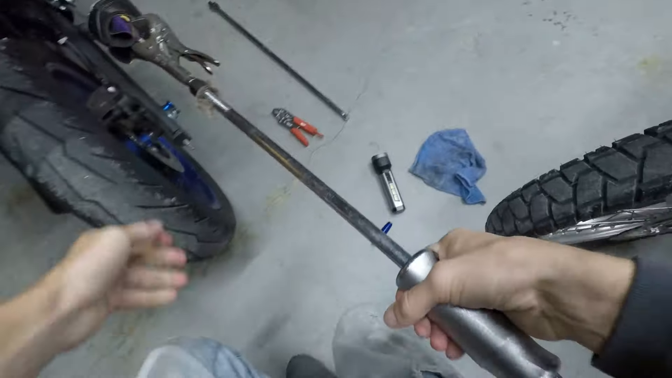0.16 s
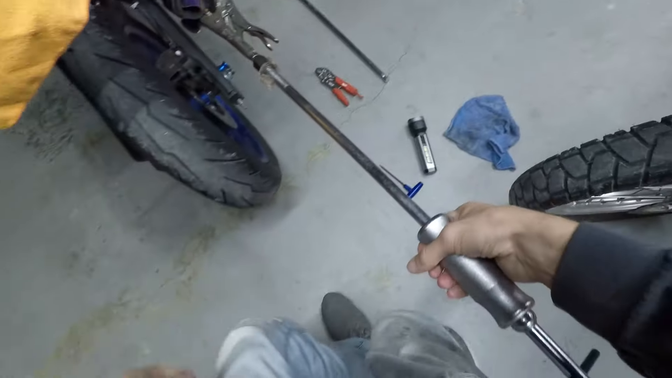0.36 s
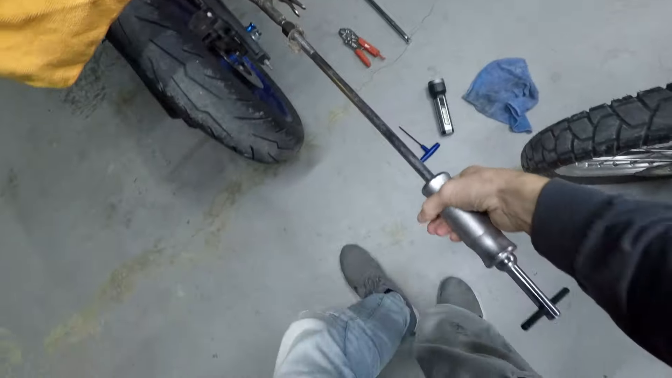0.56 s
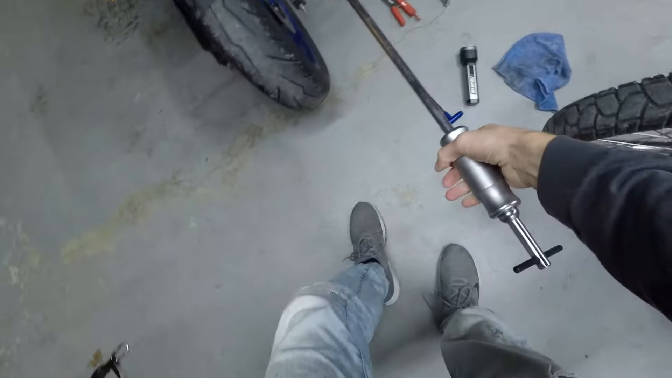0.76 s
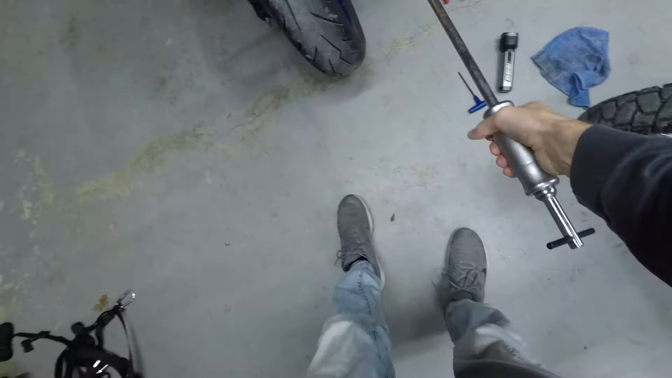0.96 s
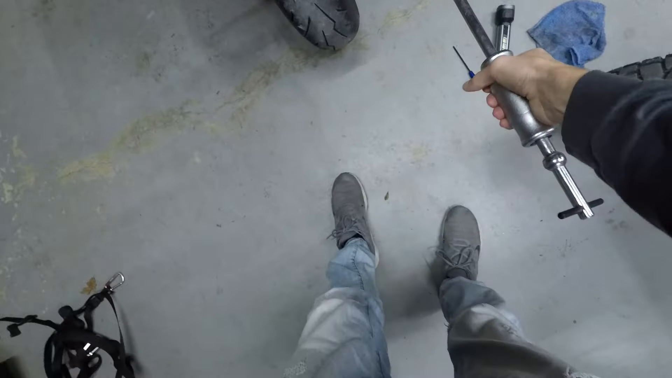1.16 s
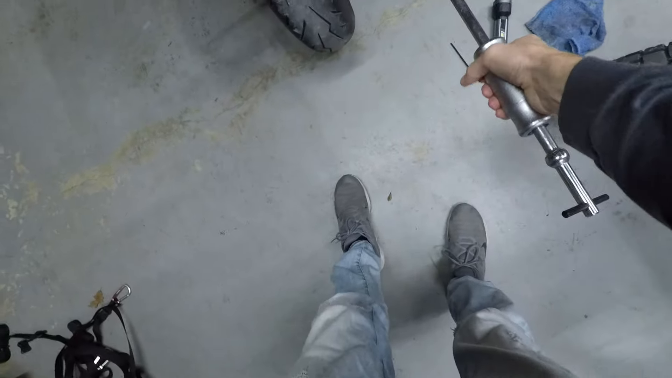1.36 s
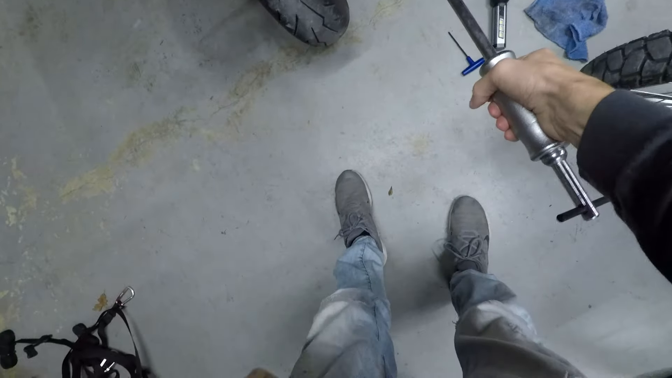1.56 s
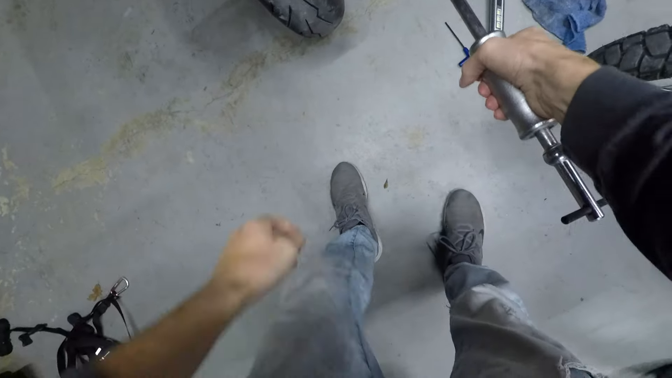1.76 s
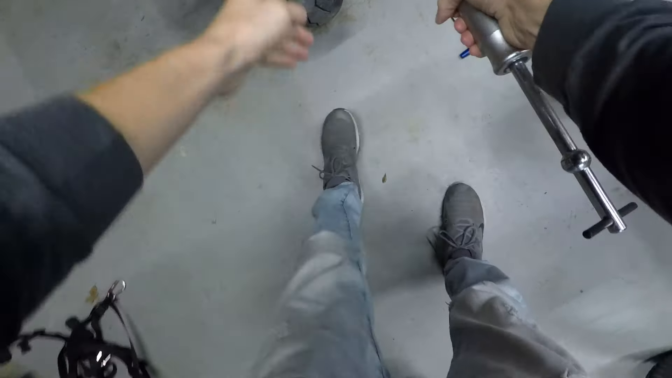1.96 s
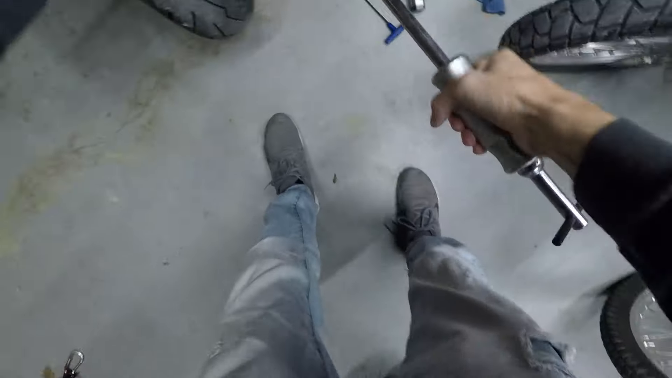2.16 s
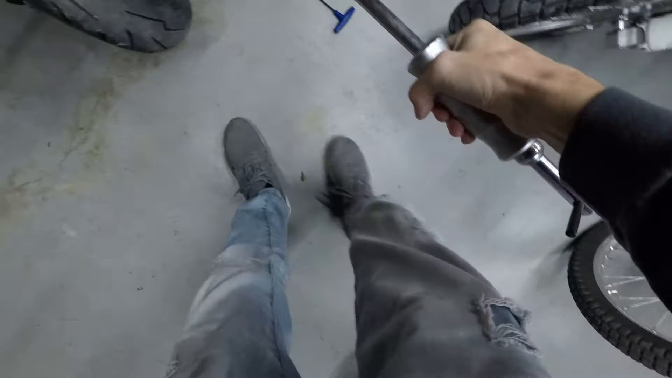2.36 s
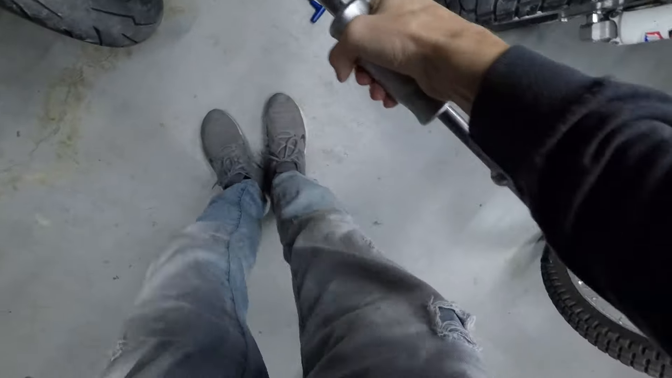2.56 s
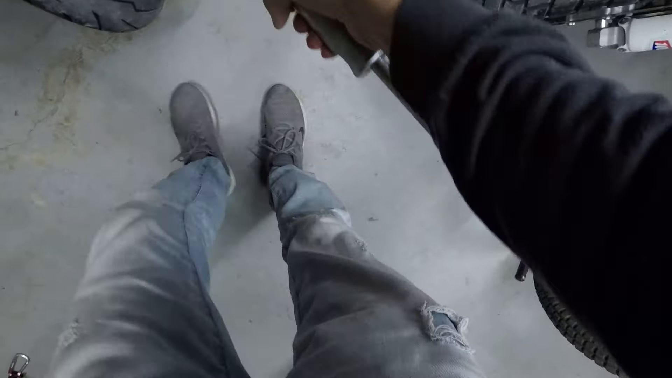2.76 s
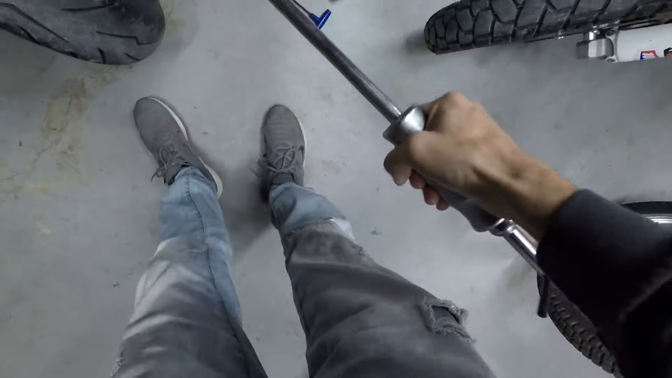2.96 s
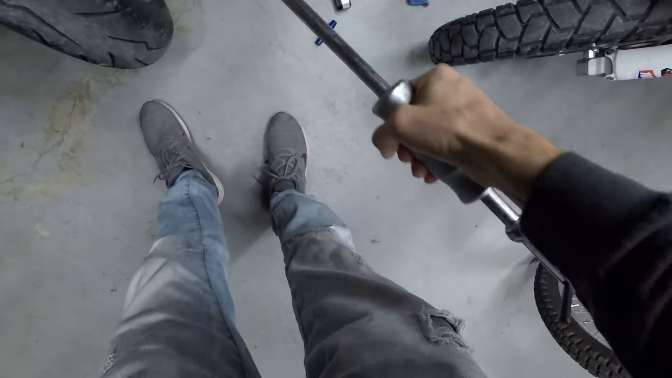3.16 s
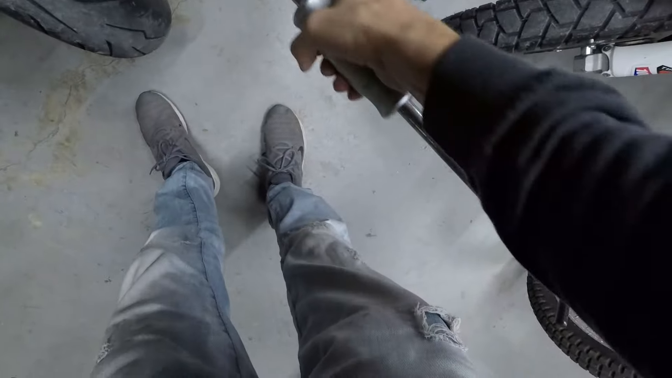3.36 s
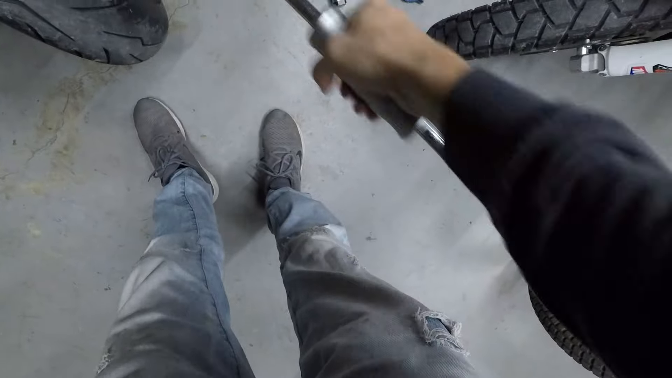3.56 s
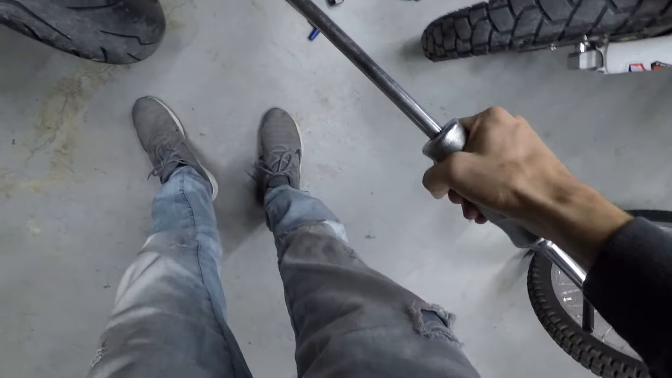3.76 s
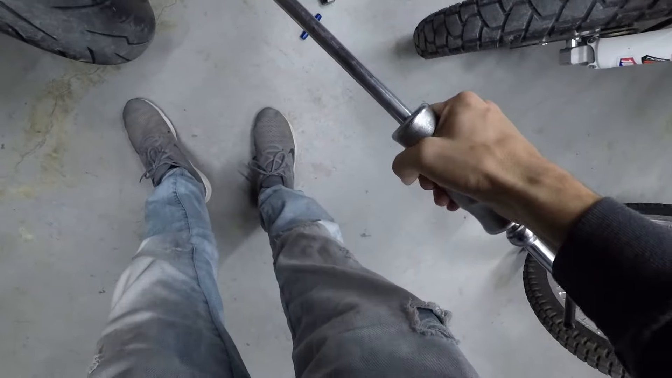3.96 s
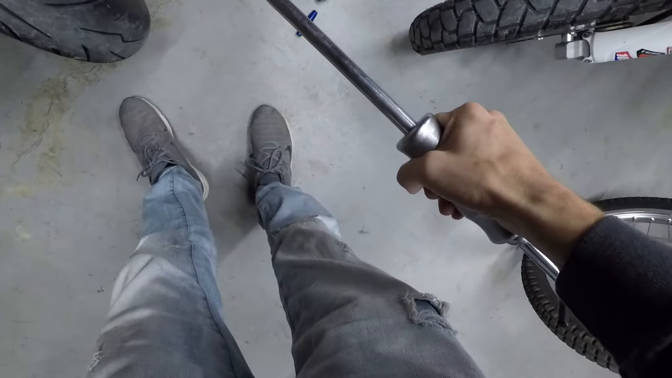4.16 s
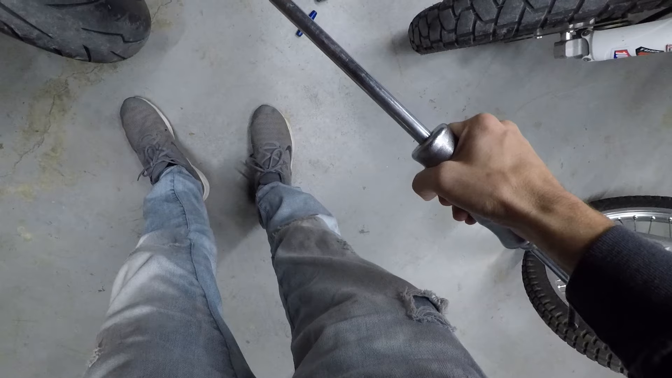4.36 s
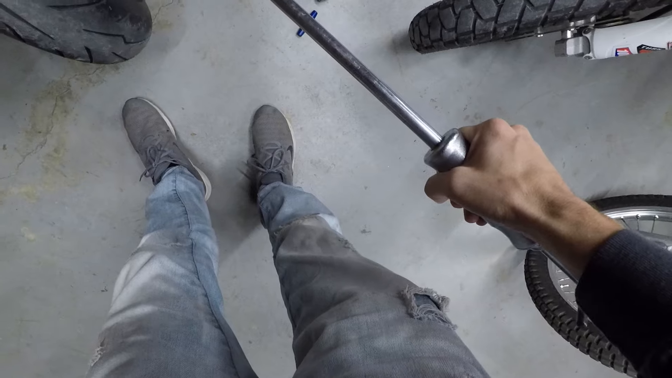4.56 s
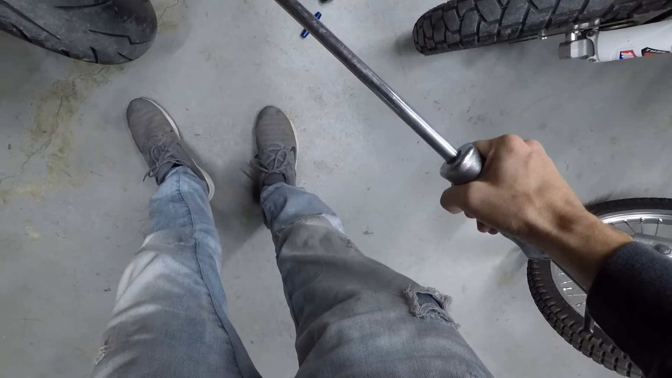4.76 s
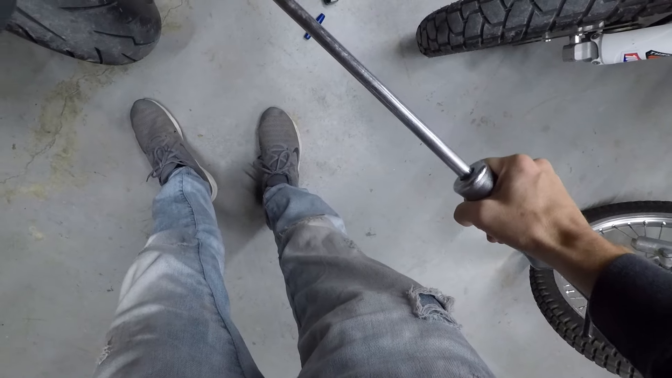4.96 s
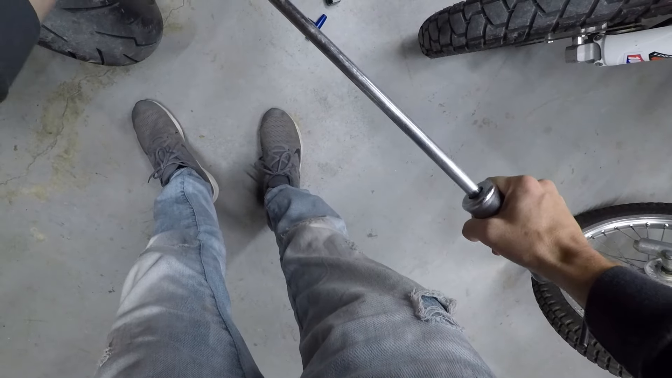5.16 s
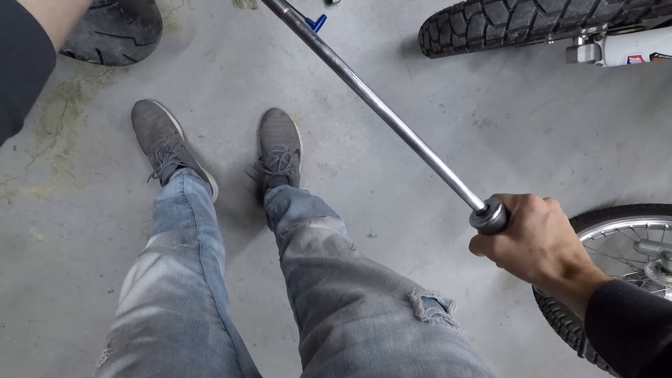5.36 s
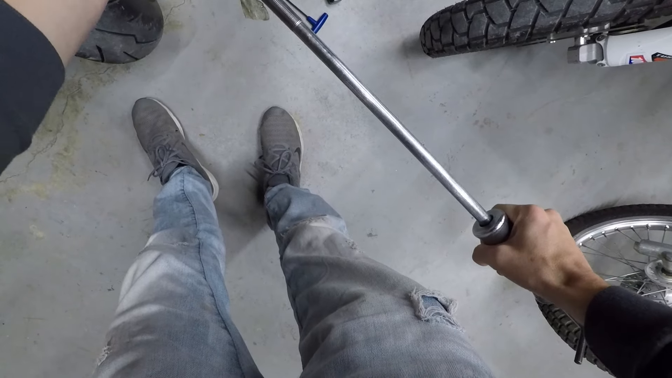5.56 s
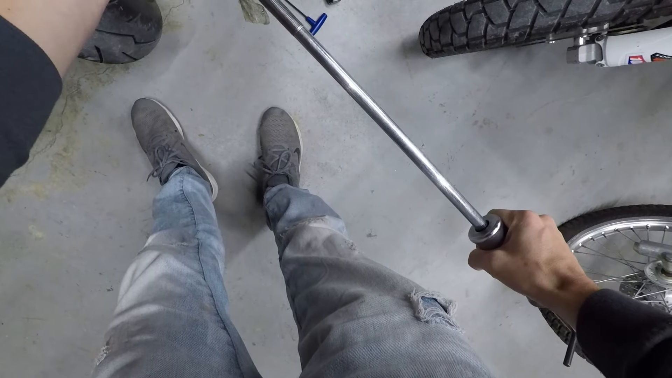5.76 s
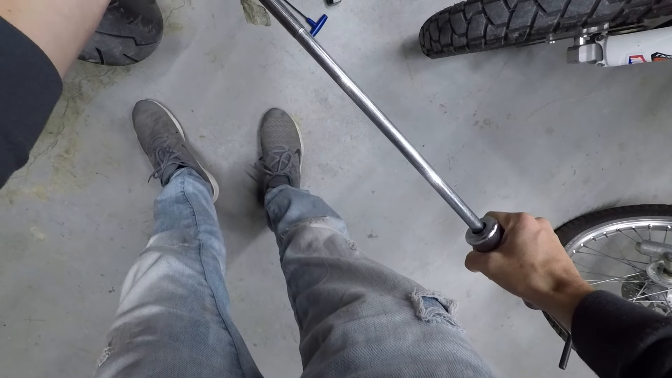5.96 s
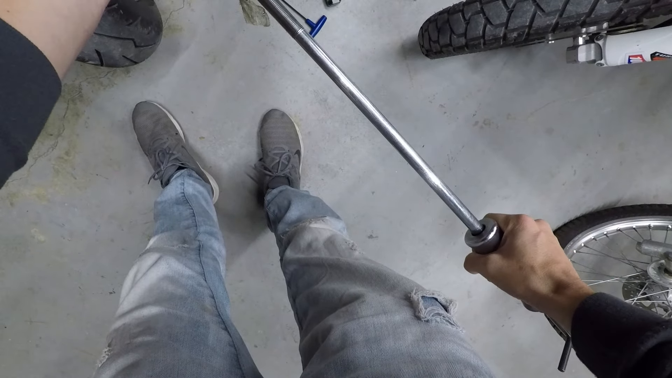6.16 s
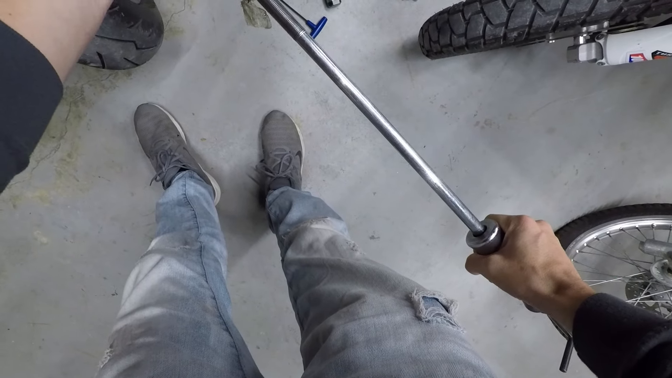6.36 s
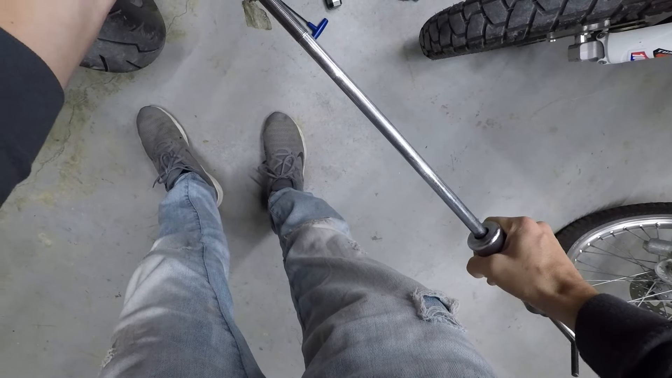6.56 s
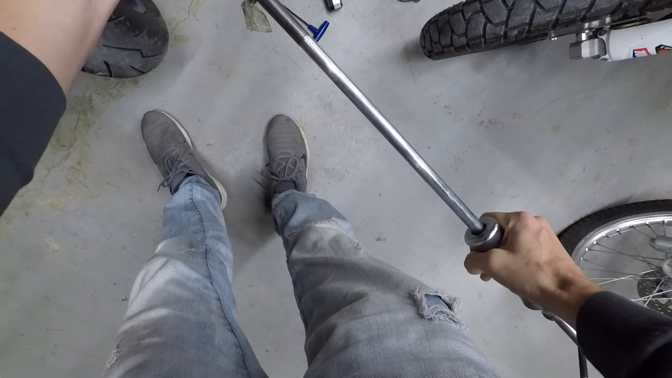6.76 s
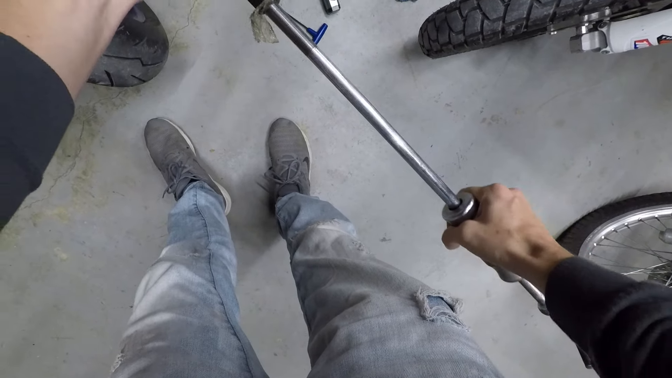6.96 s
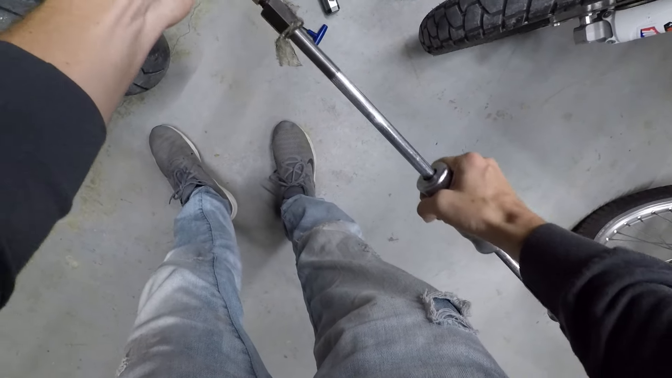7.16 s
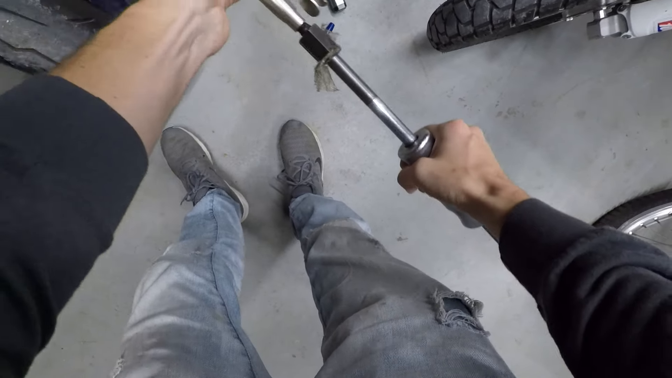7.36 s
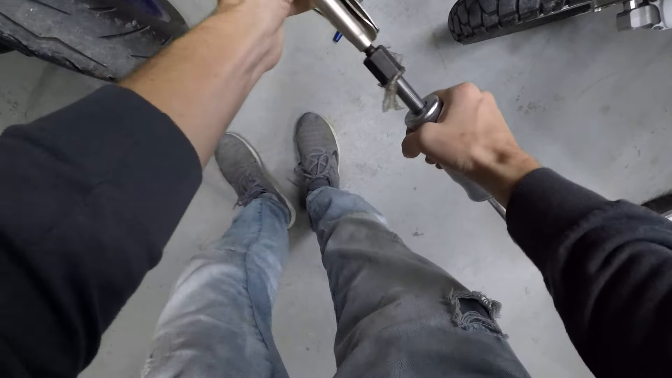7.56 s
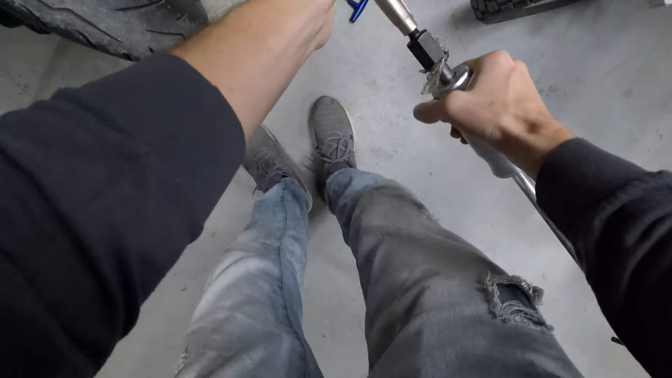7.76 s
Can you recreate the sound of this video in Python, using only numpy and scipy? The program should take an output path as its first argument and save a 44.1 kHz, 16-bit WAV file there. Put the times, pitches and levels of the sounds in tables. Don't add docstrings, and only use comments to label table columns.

```python
import sys
import numpy as np
from scipy import signal
from scipy.fft import rfft, irfft
from scipy.io import wavfile
from scipy.ndimage import uniform_filter1d

SR = 44100
rng = np.random.default_rng(int(sys.argv[2]) if len(sys.argv) > 2 else 0)


def elevation(decibels):
    levels = np.asarray(decibels, float)
    return 10 ** (levels / 20)


def unload_wav(signal):
    wavfile.write(
        sys.argv[1],
        SR,
        np.round(np.clip(np.atleast_2d(signal).T, -1, 1) * 32767).astype(np.int16),
    )


N = 344762
LEAD = SR // 4

# first touch t/s, peak level/dB, case jolt level/dB, clatter length t/s, wait for the full blow t/s,
# treble tilt/dB, free ring level/dB
BLOWS = [
    (1.4288, -4, -51.5, 0.0068, .0036, 0, -24),
    (2.1303, 2, -34, .005, 0.0018, 1, -23),
    (2.888, 2, -25.5, .0065, 0.0013, 1, -27),
    (3.6423, 1, -31, .007, .0015, 2.5, -26),
    (4.1203, -22.5, -63, 0.0073, 0.0011, -1, -26),
]
# start t/s, length t/s, first level/dB, last level/dB,
# treble tilt/dB
STROKES = [
    [(1.016, 0.086, -48.5, -62, -21), (1.11, 0.14, -62, -57, -18)],
    [(1.33, 0.06, -74, -48, -16.5), (1.39, 0.046, -45, -43, -12)],
    [(1.665, .08, -47.5, -55, -14.5)],
    [(1.754, 0.08, -45, -47, -13)],
    [(1.835, 0.14, -45, -59, -14)],
    [(1.99, .13, -63, -39, -11.5)],
    [(2.45, .025, -58, -50, -15), (2.47, 0.07, -46, -46, -14.5)],
    [(2.535, 0.09, -43, -47, -14.5)],
    [(2.62, 0.11, -44, -60, -14.5)],
    [(2.78, .025, -32, -49.5, -2.5), (2.81, .075, -49.5, -44.5, 5.5)],
    [(3.15, .2, -56, -46.5, -18), (3.355, 0.11, -44.5, -61, -20)],
    [(3.5, .075, -64, -44, -10), (3.585, .055, -39, -42.5, -7)],
    [(4.15, .11, -63, -68, -3), (4.29, .11, -58, -76.5, -4)],
    [(4.615, .07, -78, -78, 10), (4.695, 0.13, -69, -79, 8)],
    [(4.85, 0.13, -73, -72, 6)],
    [(5.03, .08, -72, -65, 3), (5.14, 0.048, -69, -65, -5)],
]
# f/Hz, width/Hz, level among the modes/dB
ROD_EARLY = [
    [(910, 61, 0), (1430, 27, 0), (1640, 70, -6), (2470, 46, -6), (3620, 64, -9), (4790, 52, -13),
     (7520, 140, -21)],
    [(910, 71, -9), (1502, 40, -4), (2472, 55, -4), (3000, 81, -5), (4150, 50, 1), (7550, 70, -9)],
    [(480, 50, -8), (904, 60, -8), (1760, 93, -4), (2130, 40, -5), (3290, 80, -5), (4120, 42, -5),
     (4810, 31, -1)],
    [(754, 66, -7), (1780, 35, -3), (2110, 53, 0), (2510, 190, -6), (4150, 41, -9), (5330, 38, -11)],
    [(764, 25, -1), (1380, 51, 0), (2090, 36, -3), (2950, 30, -3), (3290, 30, -7), (3690, 34, -6)],
    [(1380, 110, -3), (1870, 53, -1), (2920, 36, -2), (3860, 140, 0), (4740, 76, -5), (5740, 160, -9),
     (6290, 160, -7)],
    [(1460, 60, 0), (2980, 34, -3), (4190, 240, -2), (4790, 25, -3), (5470, 150, -7), (7850, 38, -9)],
    [(775, 32, -6), (1410, 41, -5), (4220, 190, 0), (4760, 34, -6), (5640, 46, -8), (7850, 31, -17)],
    [(1640, 54, -1), (2070, 170, -8), (3200, 49, -2), (4260, 80, -4), (4830, 47, 0), (7630, 61, -13)],
]
# f/Hz, width/Hz, level among the modes/dB
ROD_LATER = [
    [(1450, 61, -2.5), (3800, 90, -6), (4950, 120, -4), (7580, 90, -1), (9100, 100, -3), (10800, 70, -6),
     (12400, 90, -9)],
    [(1400, 60, 5), (2457, 48, -3), (2700, 60, -5), (3530, 80, -7), (4700, 68, -16)],
    [(1400, 92, -2.5), (2610, 51, 0.5), (3500, 34, -4), (6170, 110, -5), (7310, 81, -14), (9130, 83, -8)],
    [(797, 77, 11), (2430, 50, 2), (5630, 54, -10), (7580, 56, -13)],
    [(2310, 66, -2), (4300, 40, 0), (5400, 50, -1), (7250, 70, 0), (8000, 90, -2), (8450, 50, -3),
     (14300, 180, -10)],
    [(2200, 66, -3), (4200, 25, 5), (7050, 50, 1), (8000, 90, -6), (8900, 60, -2), (10500, 90, -7),
     (14200, 180, -10)],
    [(2280, 40, 4), (4300, 80, -4), (6100, 90, -5), (7300, 70, -3), (8900, 70, -2)],
]
# f/Hz, width/Hz, level above the scrape/dB
BAR = [(560, 53, -10.5), (1160, 50, -14), (1655, 60, -6), (2140, 50, -9), (2900, 50, -6), (3370, 50, -9),
       (4680, 70, -8), (5520, 70, -11), (5930, 88, -13), (6300, 80, -18.5), (7440, 70, -13)]
# f/Hz, level per Hz/dB
SCRAPE = [(180, -51), (300, -19), (444, -5), (597, -14.5), (763, 0), (1010, -9.5), (1420, -2), (3440, -7.5),
          (4180, -9), (15000, -37)]
# start t/s, length t/s, first level/dB, last level/dB,
# tube ring above the scrape level/dB
DRAG = [
    [(6.72, .055, -80, -70, -20), (6.775, .2, -66, -63, -14), (6.97, 0.04, -60.5, -59, -16),
     (7.01, .07, -60, -59, -1)],
    [(7.08, 0.1, -47.5, -56, 1.5), (7.18, 0.09, -54, -52, -8), (7.265, 0.12, -48, -56, -6),
     (7.38, 0.036, -47.5, -48, -6), (7.43, 0.075, -48, -47, -3)],
    [(7.505, 0.07, -29, -37, 5), (7.575, .09, -37, -54, 1), (7.665, .05, -58, -64, 9),
     (7.71, 0.045, -66, -54, 15), (7.75, 0.073, -44, -39, 1)],
]
# f/Hz, width/Hz, level/dB
TUBE = [
    [(1250, 120, -14), (1720, 42, -12.5), (2040, 67, -7), (2280, 31, -21), (2516, 27, 1), (4200, 46, -4),
     (5600, 60, -8), (4850, 120, -9.5), (6250, 68, -11), (7550, 210, -22)],
    [(1155, 34, -13), (1563, 30, 0), (1895, 44, -6), (2477, 78, 0.5), (2900, 73, -4), (3370, 37, -10.5),
     (3534, 27, -2.5), (4300, 51, -1.5), (4930, 82, -2), (5650, 76, -11.5), (6330, 63, -11)],
    [(1867, 156, 2), (2570, 30, -3), (2850, 60, -2), (3400, 60, -5), (3925, 39, -4), (4220, 50, -3),
     (5320, 50, -4), (5700, 110, -7), (6540, 62, -19), (7280, 23, -27), (7720, 45, -22)],
]
# f/Hz, width/Hz, level/dB
TUBE_RING = [(916, 17, 0), (968, 30, -8), (840, 50, -10)]


def evened(x):
    return x / np.sqrt(np.mean(x ** 2) + 1e-20)


def peaked(x):
    return x / abs(x).max()


def read(points, hz):
    f, value = np.transpose(points)
    return np.interp(np.log(hz + 1), np.log(f + 1), value)


def add(mix, s, sound):
    part = mix[round(s * SR) + LEAD:][:len(sound)]
    part += sound[:len(part)]


def colour(x, points, tilt_db=0):
    hz = np.fft.rfftfreq(2 * len(x), 1 / SR)
    lift_db = tilt_db * np.clip(np.log2(hz / 3500 + 1e-9), -1, 1.6)
    return irfft(rfft(x, 2 * len(x)) * elevation(read(points, hz) + lift_db))[:len(x)]


def ring(x, modes, spread_db=0, wander_db=0):
    out = np.zeros(len(x))
    steps = np.arange(0, len(x) + 1300, 1300)
    chances = rng.standard_normal((len(modes), len(steps) + 2))
    for (hz, width, db), luck in zip(modes, chances):
        r = np.exp(-np.pi * width / SR)
        wander = wander_db * np.interp(np.arange(len(x)), steps, luck[2:])
        mix_db = db + spread_db * luck[0] + wander
        hz = hz * (1 + .005 * spread_db * luck[1])
        poles = [1, -2 * r * np.cos(2 * np.pi * hz / SR), r * r]
        out += signal.lfilter([1 - r, 0, r - 1], poles, x * elevation(mix_db))
    return out


def clatter(length, rise=0.0008, shape=0.7):
    t = np.arange(SR // 5) / SR
    decay = np.exp(-(t / max(length, .001)) ** shape)
    return rng.standard_normal(len(t)) * (1 - np.exp(-t / rise)) * decay


def grit(count, rough=.6, grain=60):
    slips = evened(uniform_filter1d(rng.standard_normal(count), max(int(grain), 1)))
    return evened(rng.standard_normal(count) * np.exp(rough * slips))


def push(t, start, length, first_db, last_db):
    grip_s, slip_s = .008, 0.011
    hold = np.clip((t - start) / grip_s, 0, 1) * np.exp(-np.maximum(t - start - length, 0) / slip_s)
    return hold * elevation(np.interp(t, [start, start + length], [first_db, last_db]))


def during(rows):
    return np.arange(rows[0][0], rows[-1][0] + rows[-1][1] + .1, 1 / SR)


def glide(x, drive, depth):
    creep = evened(uniform_filter1d(uniform_filter1d(drive, size=2500), size=2500))
    at = np.cumsum(1 + depth * creep)
    return np.interp(at - at[0], np.arange(len(x)), x)


def knocks(rows, length, modes_at, ring_db, spread_db):
    out = np.zeros(N + LEAD)
    for s, db, tilt_db, hz in rows:
        drive = clatter(length, rise=.002)
        burst = peaked(colour(drive, SCRAPE, 0.5 * tilt_db + 7.5))
        flat_drive = colour(drive, [(100, 0), (16000, 0)], .5 * tilt_db + 7.0)
        body = burst + elevation(ring_db) * peaked(ring(flat_drive, modes_at(s), spread_db))
        hardest = peaked(ring(drive, [(hz, 120, 0)]))
        body = peaked(body) + elevation(-5) * hardest
        add(out, s, elevation(db - 1.5) * peaked(body))
    return out


def quiet_floor():
    # f/Hz, level per Hz/dB
    hush = [(24, -40), (40, -7.5), (91, -1.5), (115, -8.5), (231, -7.5), (290, -5.5), (329, -10.5),
            (542, -14), (6170, -32), (14500, -32), (16000, -35.5)]
    return elevation(-64.5) * evened(colour(rng.standard_normal(N + LEAD), hush))


def shaking():
    # t/s, level/dB
    sway = [(0, -32), (.45, -39.5), (.85, -46), (.95, -31.5), (1.28, -41.5), (1.55, -32.5), (1.85, -32),
            (2.2, -29), (2.48, -40), (2.9, -27.5), (3.15, -30), (3.3, -44.5), (3.8, -34), (4.9, -46.5),
            (5.3, -50.5), (6.65, -54), (6.8, -41), (7.82, -40.5)]
    t = np.arange(N + LEAD) / SR
    spectrum = [(1.5, -20.5), (4, 3.0), (9, 4.0), (20, -9.5), (40, -23.5), (80, -36.0), (200, -41), (20000, -120)]
    lurch = evened(colour(rng.standard_normal(len(t)), spectrum))
    out = elevation(np.interp(t - LEAD / SR, *np.transpose(sway))) * lurch
    u = t[:SR // 5] / 0.0022
    for s, _, jolt_db, *_ in BLOWS:
        add(out, s + .004, -elevation(jolt_db + 25) * u * np.exp(-u) * (1 - u / 3))
    return out


def garage(x):
    # f/Hz, t60/s
    decay_times = [(250, 0.93), (660, 0.42), (1740, 0.58), (4590, 0.58), (12100, 0.38)]
    # f/Hz, level/dB
    tone = [(150, -9.5), (400, -1), (1000, 1), (2000, -1.5), (4000, -4.5), (8000, -5.5), (14000, -3)]
    onset = np.clip((np.arange(SR) / SR - .005) / 0.0025, 0, 1)
    taps = rng.standard_normal(SR) * onset
    hz, t, z = signal.stft(taps, SR, nperseg=256)
    level_db = read(tone, hz)[:, None] - 60 * t / read(decay_times, hz)[:, None]
    tail = signal.istft(z * elevation(level_db), SR, nperseg=256)[1]
    return signal.fftconvolve(x, tail / np.linalg.norm(tail))[:len(x)]


def swish():
    brushes = [
        (.68, .12, -69, -77),
        (.897, .09, -64, -74.5),
    ]
    t = during(brushes)
    cloth = [(500, -10.0), (2000, 0.5), (8000, -0.5), (15000, -11.0)]
    hiss = evened(colour(rng.standard_normal(len(t)), cloth))
    return t[0], sum(push(t, *row) for row in brushes) * hiss


def ping():
    # t/s, peak level/dB, f/Hz, t60/s
    s, db, hz, t60 = (4.70, -65, 3810, .36)
    t = np.arange(SR // 3) / SR
    return s, elevation(db - 60 * t / t60) * np.sin(2 * np.pi * hz * t)


def clamp_clicks():
    # t/s, peak level/dB, treble tilt/dB, hardest mode f/Hz
    clicks = [
        (.294, -55, -22, 2000),
        (.683, -60, 0, 5000),
        (5.7757, -41, -14, 2250),
    ]
    # f/Hz, width/Hz, level/dB
    clamp = [(970, 76, -3), (1560, 200, -8), (2250, 41, -10), (2540, 220, -2), (3510, 31, -20),
             (4700, 66, -11)]
    return knocks(clicks, 0.002, lambda s: clamp, 4.2, 1)


def tocks():
    # t/s, peak level/dB, pitch f/Hz, second mode level/dB
    taps = [
        (2.641, -39.5, 440, -14),
        (4.202, -33, 455, -9),
        (4.34, -52, 455, -6),
        (4.703, -47, 446, -14),
        (5.179, -49, 423, -2),
    ]
    out, t = np.zeros(N + LEAD), np.arange(SR // 5) / SR
    for s, db, hz, upper_db in taps:
        pair = np.sin(2 * np.pi * hz * t) + elevation(upper_db) * np.sin(2 * np.pi * 1.78 * hz * t)
        soft_touch = 1 - np.exp(-(t / 0.004) ** 2)
        add(out, s, elevation(db - 60 * t / 0.06) * pair * soft_touch)
    return out


def baffle(rows, modes):
    t = during(rows)
    drive = grit(len(t), rough=0.35, grain=74)
    thin_wall = [(400, -20), (1100, -1.5), (2500, 2), (5000, -9.5), (8000, -26), (14000, -48)]
    scrape = evened(colour(drive, thin_wall))
    ringing = evened(glide(ring(drive, modes, wander_db=5), drive, .015))
    wall = evened(scrape + elevation(-0.5) * ringing)
    beating = evened(ring(ring(drive, TUBE_RING, wander_db=1.5), [(935, 220, 0)]))
    tugs = sum(push(t, *row) * elevation(-1.0) * (wall + elevation(ring_db) * beating) for *row, ring_db in rows)
    return t[0], tugs


def baffle_clanks():
    # t/s, peak level/dB, treble tilt/dB, hardest mode f/Hz
    clanks = [(6.7792, -55, -25, 2030), (6.9867, -50, -25, 2470), (7.084, -30, -19, 4200),
              (7.1807, -44, -20, 2540), (7.1957, -41, -18, 2540), (7.2331, -45, -20, 2500),
              (7.2715, -40, -20, 2900), (7.355, -34, -8, 2440), (7.383, -28, -18, 3500),
              (7.4215, -23, -18, 1880), (7.503, -18, -9, 2600), (7.5145, -7.5, 0, 6550),
              (7.531, -26, -7, 4200), (7.553, -27, -12, 2600), (7.574, -22, -24, 925),
              (7.612, -30, -20, 1900), (7.7515, -39, -15, 1890), (7.7993, -30, -15, 1730),
              (7.813, -24, -12, 2700)]

    def tube_at(s):
        return TUBE[1 + (s > DRAG[2][0][0] - .01)] + TUBE_RING

    return knocks(clanks, 0.0053, tube_at, 6.2, 3.5)


def slide(rows, modes):
    # f/Hz, width/Hz, level/dB
    lengthwise = (11200, 40, -12)
    t = during(rows)
    drive = grit(len(t), rough=0.36, grain=220)
    narrowed = [(hz, .8 * width, db) for hz, width, db in modes]
    bending = evened(glide(ring(drive, narrowed, wander_db=4), drive, .012))
    singing = evened(ring(drive, [lengthwise], wander_db=3))
    body = evened(colour(drive, SCRAPE, 4)) + elevation(1.5) * bending + elevation(-13) * singing
    dull = evened(signal.sosfilt(signal.butter(3, 6000, "low", fs=SR, output="sos"), body))
    bright = evened(signal.sosfilt(signal.butter(3, 6000, "high", fs=SR, output="sos"), body))
    pushes = sum(push(t, *row) * elevation(-1.5) * (dull + elevation(tilt_db - 3) * bright) for *row, tilt_db in rows)
    return t[0], pushes


def rod_at(s):
    starts = [rows[0][0] for rows in STROKES]
    return (ROD_EARLY + ROD_LATER)[max(np.searchsorted(starts, s + .02) - 1, 0)]


def rod_knocks():
    # t/s, peak level/dB, treble tilt/dB, hardest mode f/Hz
    contacts = [(1.0181, -36, -18, 3620), (1.6696, -30, -14, 3800), (1.7545, -32.5, -18, 2100),
                (1.8058, -39, -22, 4300), (1.8357, -36, -20, 3680), (2.0213, -42, -14, 2500),
                (2.0618, -36, -18, 2890), (2.0812, -31, -14, 3870), (2.4725, -39, -20.5, 4130),
                (2.5444, -30, -15, 1950), (2.5475, -26, -15, 4120), (2.5760, -36, -24, 3900),
                (2.6239, -35, -18, 3260), (2.6339, -31, -9, 4830), (2.6838, -30, -11, 1450),
                (2.7675, -40, -25, 1200), (2.7831, -22.5, -6, 5000), (2.82, -27, -6, 7630),
                (2.8619, -22.5, 4, 7540), (3.3588, -29.5, -22, 3530), (3.5420, -29, -10, 5500),
                (3.5850, -21, -11, 9130), (4.1005, -38, -24, 2500), (4.6194, -56, 8, 7250),
                (4.6972, -43, -1, 7900), (4.7400, -56, 4, 5400), (5.0780, -52, 0, 8900),
                (5.1394, -56, -10, 4300), (5.1750, -53, -30, 1600)]
    return knocks(contacts, 0.0045, lambda s: rod_at(s) + BAR, 4.7, 4)


def hammer():
    earlier_blow = (-.17, 0, -60, 0, 0.0046, -2, -15)
    # f/Hz, level per Hz/dB
    steel = [(88, -37), (150, -9.5), (398, -19), (1120, -12), (3160, -5), (4160, -6.5), (4580, -2.5),
             (7470, -5), (8400, -5.5), (9260, -2), (10200, -14), (15100, -14), (16000, -32.5)]
    # f/Hz, width/Hz, level/dB
    stop_modes = [
        [(3000, 170, -3), (4880, 200, 2), (6100, 87, -2), (7400, 60, -6), (8800, 38, -6)],
        [(3102, 41, -3), (4980, 38.8, 0), (6100, 25, -3.5), (7630, 34, -1), (11290, 53, -3), (13460, 83, -7.5)],
        [(4867, 100, -1), (6130, 37, -4), (7393, 39, 0.5), (9180, 59, -4), (11040, 70, -4.5),
         (12120, 140, -8.5)],
        [(4355, 25, -10), (5960, 38, -7), (7705, 88, 0), (8895, 62, -4.5), (10650, 47, -14.5),
         (12070, 65, -11.5)],
        [(6160, 45, -7.5), (7140, 32, -7), (7630, 75, -8.5), (9130, 60, 1), (9700, 35, -10),
         (12900, 54.86, -10.5)],
        [(4990, 50, -6), (6100, 120, -7), (7560, 84, 2), (9200, 90, -12), (10900, 60, -9), (13100, 60, -24)],
    ]
    # f/Hz, width/Hz, level/dB
    free_modes = [(3040, 11, -8), (4900, 8, 0), (6150, 11, -6), (7600, 12, -5), (9000, 14, -11)]
    # f/Hz, level per Hz/dB
    spread = [(88, -35.5), (150, -8), (484, -5), (854, -3), (1340, -9.5), (2450, -5), (4000, -4.5),
              (4760, -2), (7470, -1.5), (14800, -13.5), (16000, -26.5)]
    near, walls = np.zeros((2, N + LEAD))
    for (s, db, _, length, wait, tilt_db, ring_db), modes in zip([earlier_blow] + BLOWS, stop_modes):
        touch = 0.34 * clatter(0.0042, rise=0.00027)
        drive = touch + np.roll(clatter(length, rise=0.00012, shape=1.2), round(wait * SR))
        damped = [(hz, 2.4 * width, d) for hz, width, d in modes]
        strike = peaked(colour(drive, steel, tilt_db))
        blow = elevation(db + 4.5) * peaked(strike + elevation(-5) * peaked(ring(drive, damped)))
        impulse = np.roll(signal.unit_impulse(len(drive)), round(wait * SR))
        add(near, s, blow + elevation(db + ring_db) * peaked(ring(impulse, free_modes, .4)))
        click = colour(np.roll(signal.unit_impulse(2048), 1024), spread, tilt_db)
        add(walls, s + wait - 950 / SR, np.linalg.norm(blow) * click / np.linalg.norm(click))
    treble = signal.sosfilt(signal.butter(2, 600, "high", fs=SR, output="sos"), near)
    return near, walls + elevation(-6) * treble


def scene():
    light = rod_knocks() + clamp_clicks() + baffle_clanks()
    for rows, modes in zip(STROKES, ROD_EARLY + ROD_LATER):
        add(light, *slide(rows, modes + BAR))
    for rows, modes in zip(DRAG, TUBE):
        add(light, *baffle(rows, modes))
    add(light, *swish())
    add(light, *ping())
    handle = tocks()
    near, walls = hammer()
    echo = garage(elevation(-12.0) * walls + elevation(-10.5) * light + elevation(-17) * handle)
    return (near + light + handle + echo + shaking() + quiet_floor())[None, LEAD:]


def roll_off(x):
    return signal.sosfilt(signal.butter(12, 16440, fs=SR, output="sos"), x)


def record(dry):
    band = signal.firwin(301, 15350, window=("kaiser", 6), fs=SR)[None]
    limited = signal.oaconvolve(dry, band, "same")
    clipped = np.clip(limited, -.84, .84)
    smoothing = signal.firwin(201, 16350, window=("kaiser", 7), fs=SR)[None]
    finished = signal.oaconvolve(clipped, smoothing, "same")
    return roll_off(finished)


dry = scene()
out = record(dry)
unload_wav(out)
```